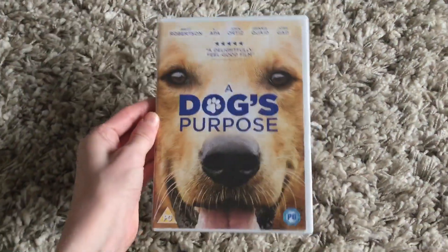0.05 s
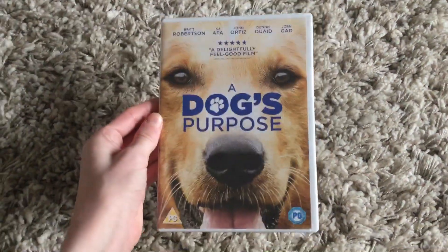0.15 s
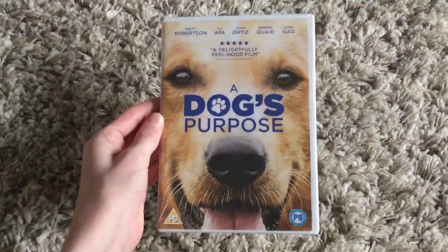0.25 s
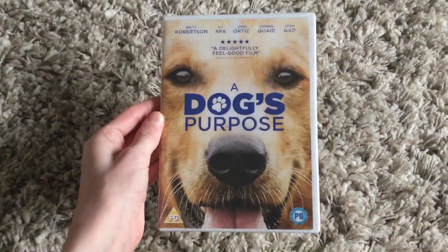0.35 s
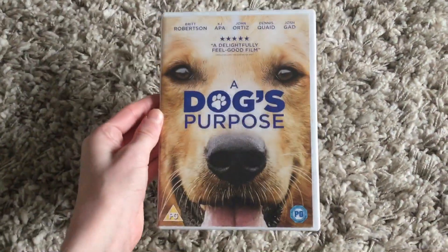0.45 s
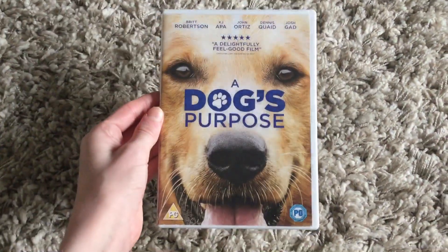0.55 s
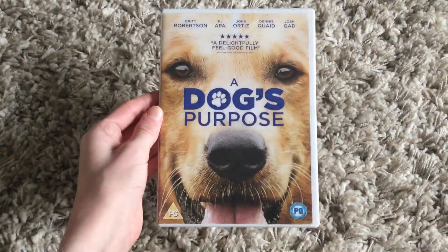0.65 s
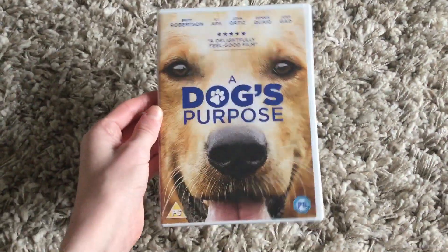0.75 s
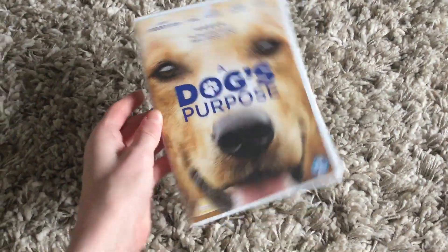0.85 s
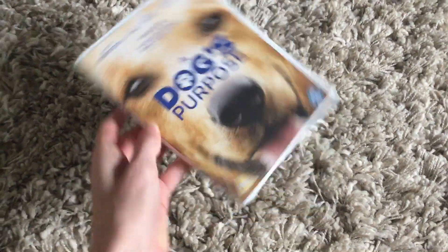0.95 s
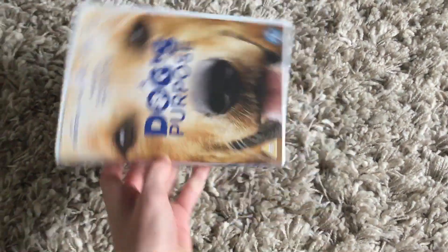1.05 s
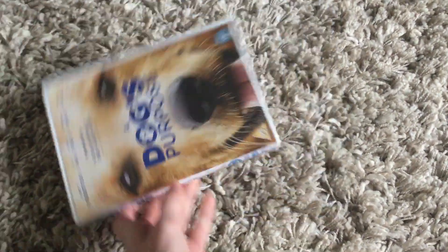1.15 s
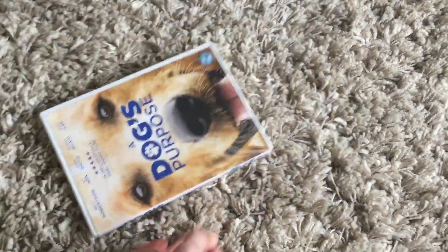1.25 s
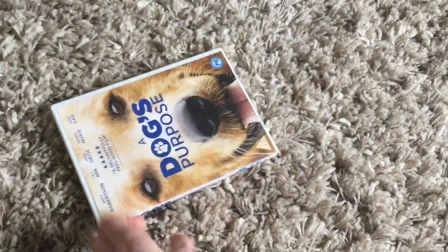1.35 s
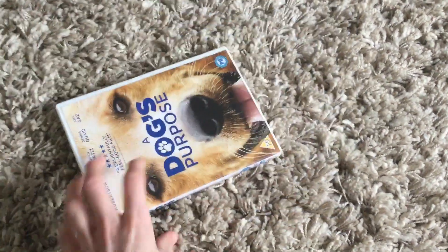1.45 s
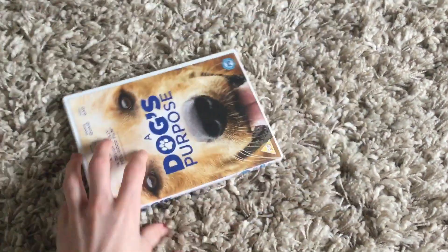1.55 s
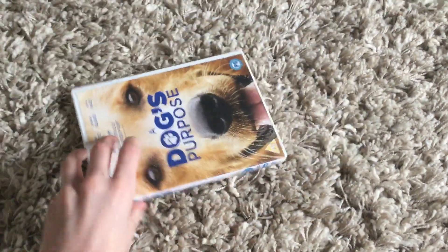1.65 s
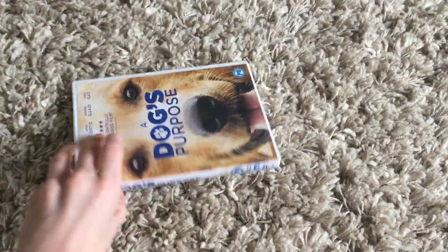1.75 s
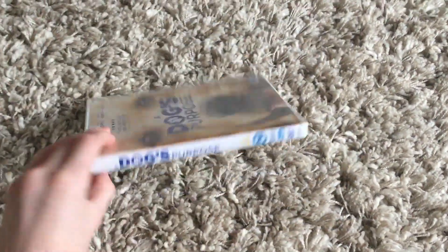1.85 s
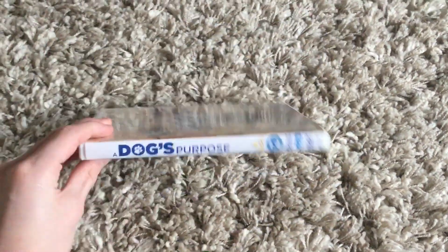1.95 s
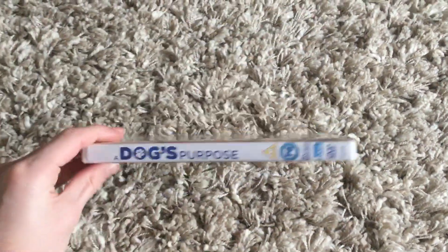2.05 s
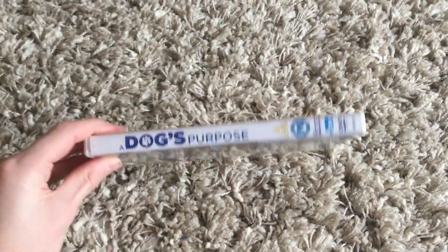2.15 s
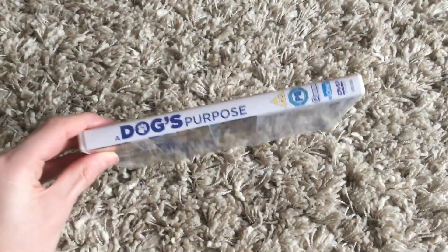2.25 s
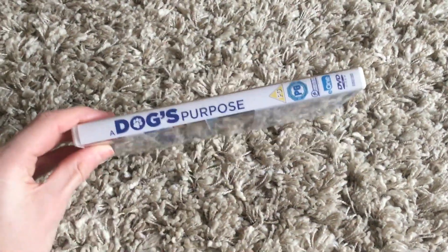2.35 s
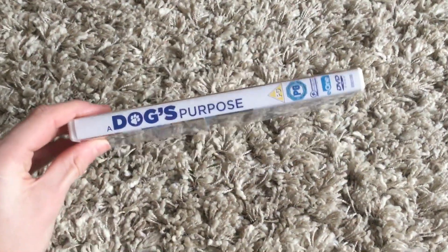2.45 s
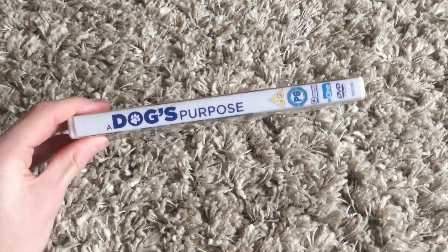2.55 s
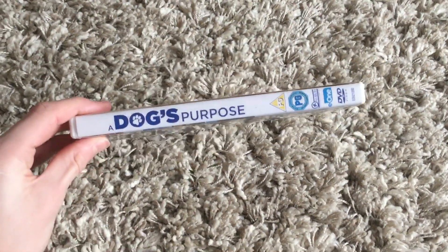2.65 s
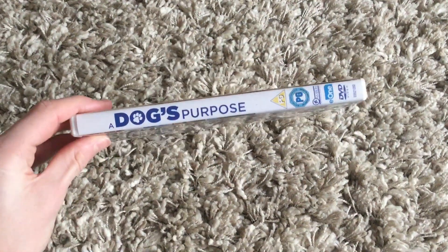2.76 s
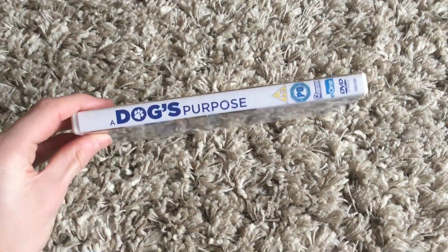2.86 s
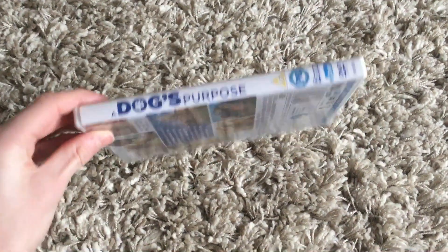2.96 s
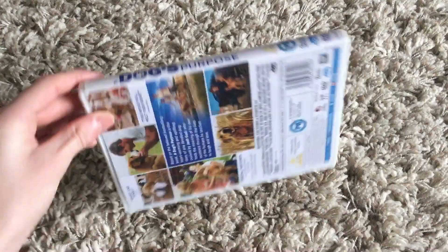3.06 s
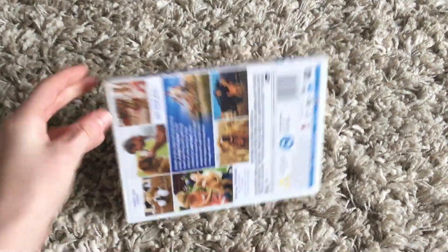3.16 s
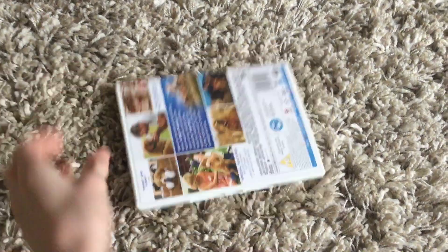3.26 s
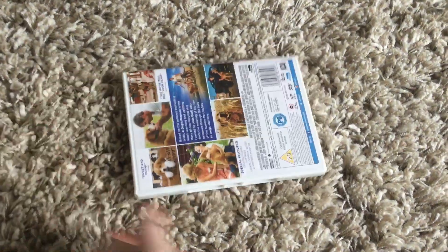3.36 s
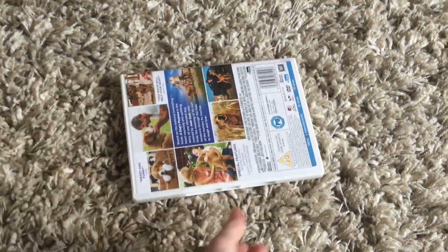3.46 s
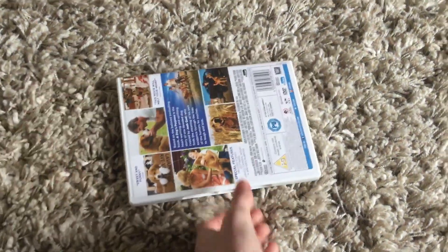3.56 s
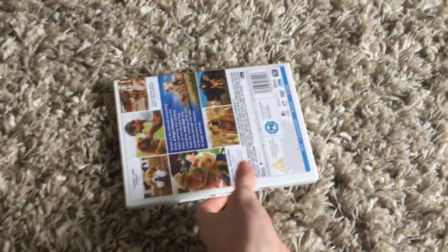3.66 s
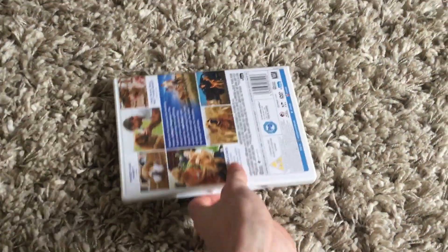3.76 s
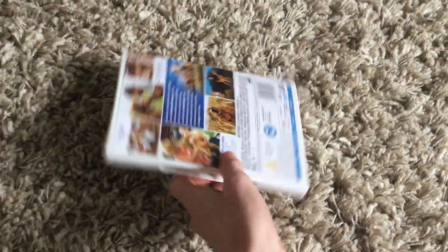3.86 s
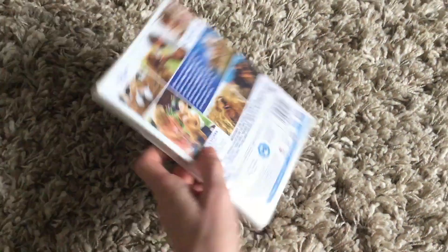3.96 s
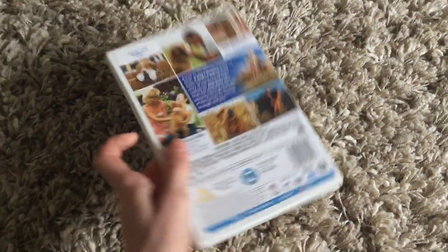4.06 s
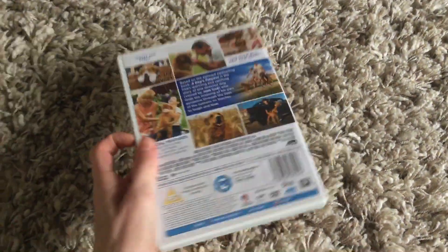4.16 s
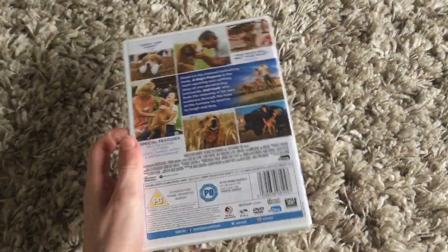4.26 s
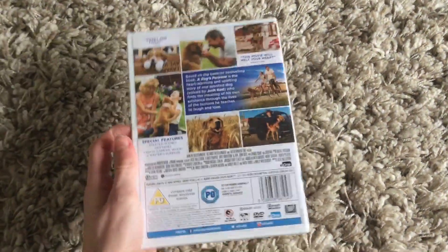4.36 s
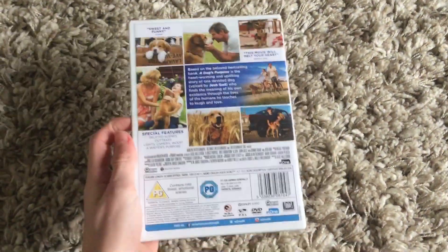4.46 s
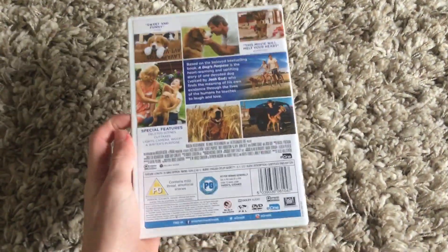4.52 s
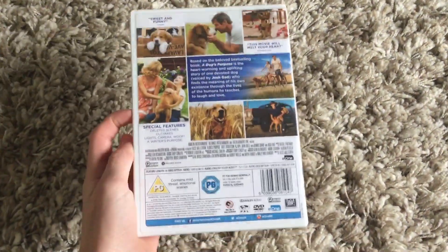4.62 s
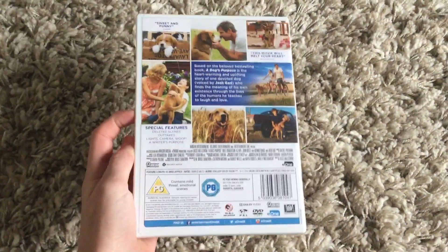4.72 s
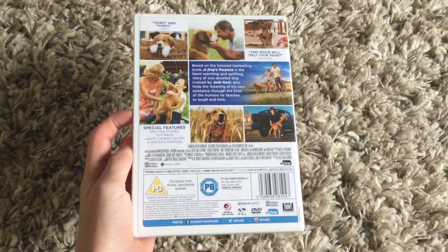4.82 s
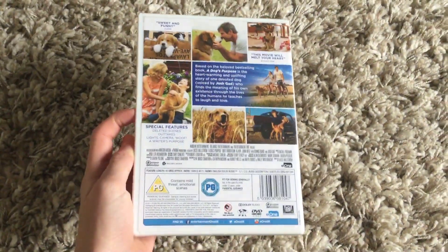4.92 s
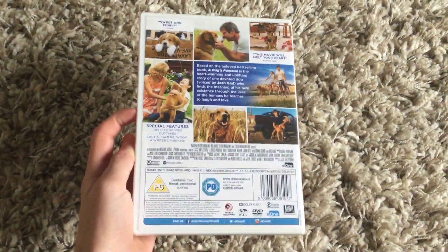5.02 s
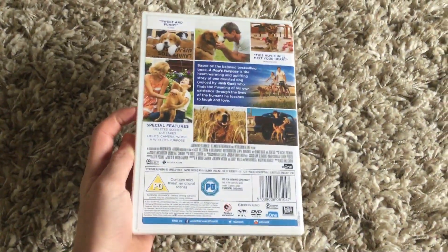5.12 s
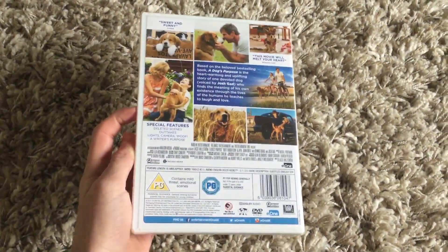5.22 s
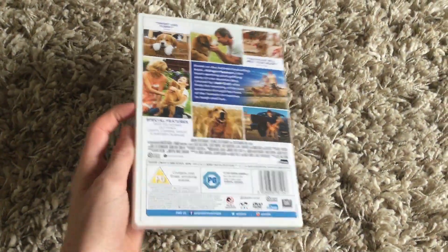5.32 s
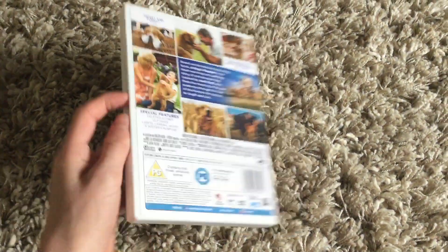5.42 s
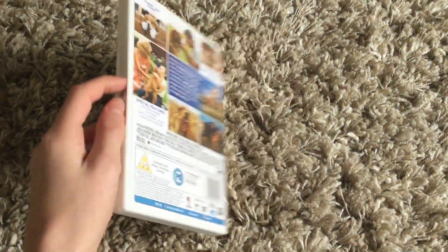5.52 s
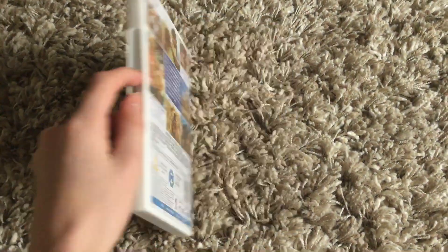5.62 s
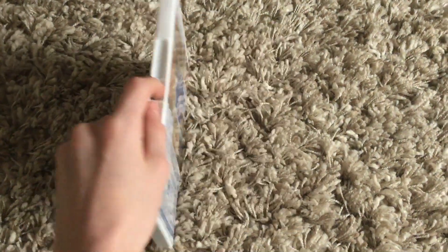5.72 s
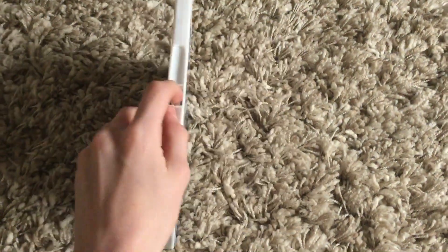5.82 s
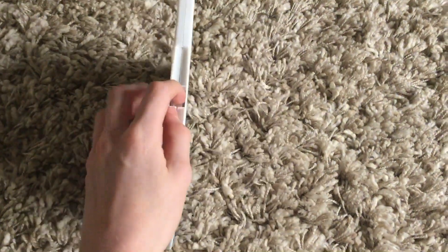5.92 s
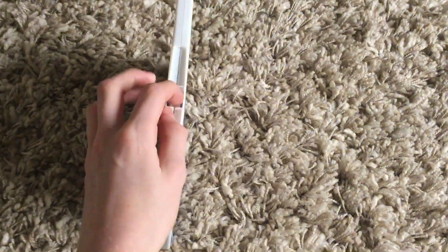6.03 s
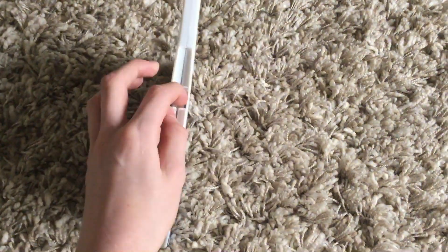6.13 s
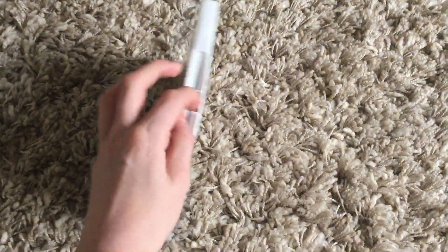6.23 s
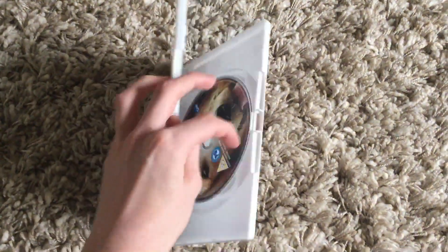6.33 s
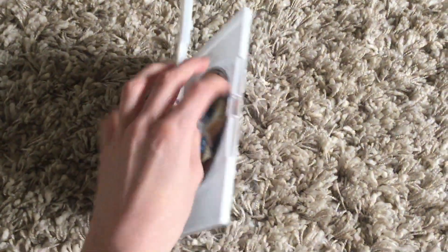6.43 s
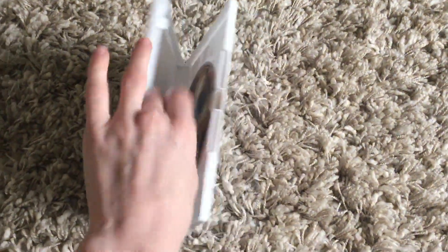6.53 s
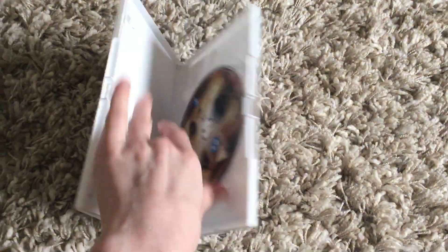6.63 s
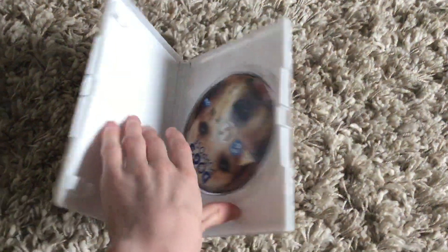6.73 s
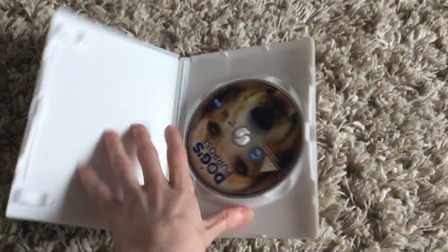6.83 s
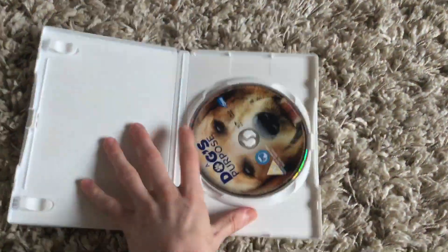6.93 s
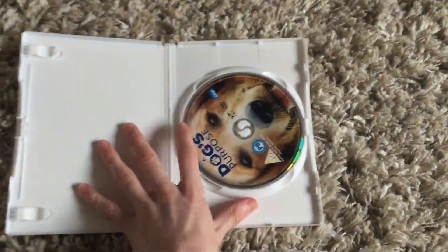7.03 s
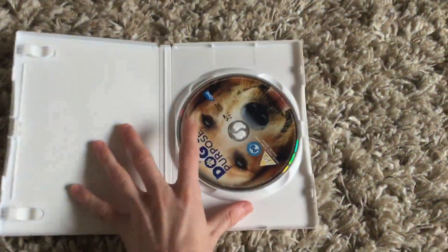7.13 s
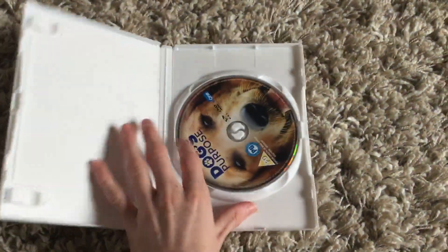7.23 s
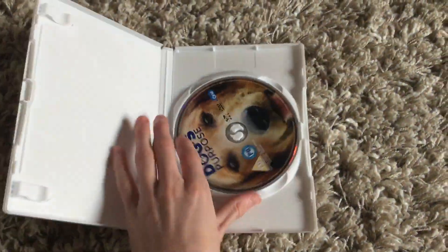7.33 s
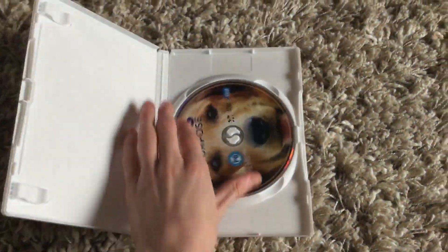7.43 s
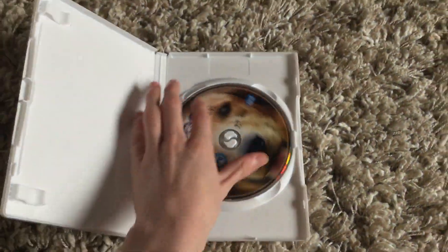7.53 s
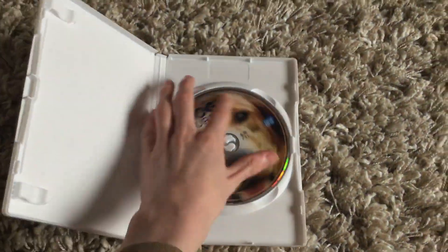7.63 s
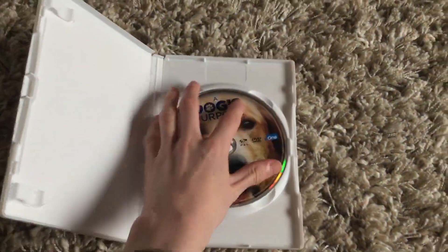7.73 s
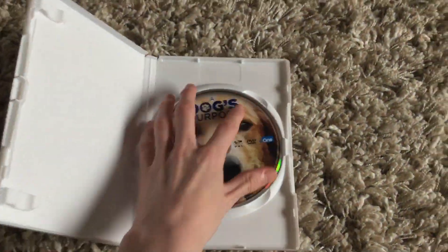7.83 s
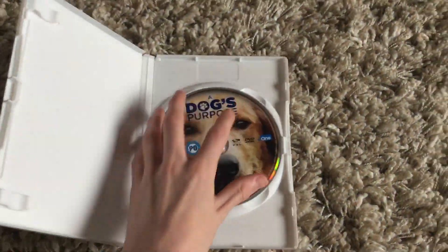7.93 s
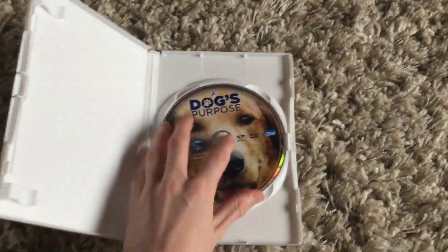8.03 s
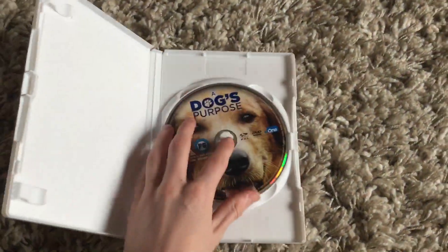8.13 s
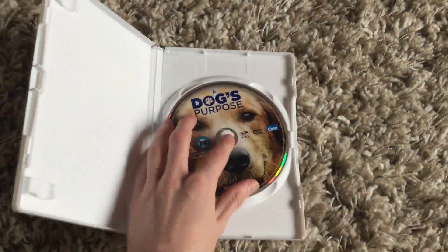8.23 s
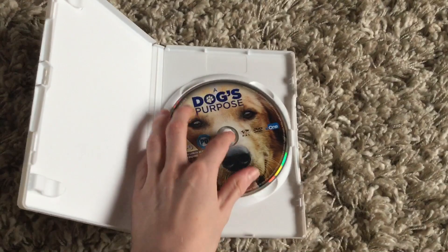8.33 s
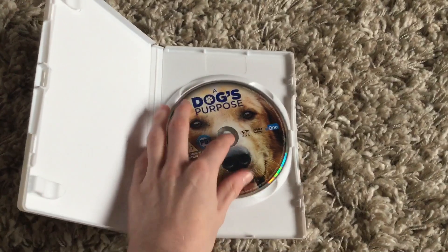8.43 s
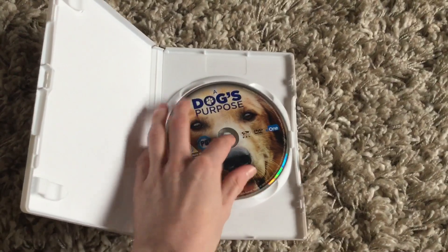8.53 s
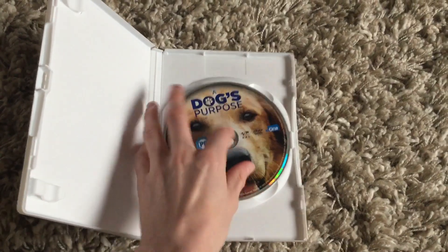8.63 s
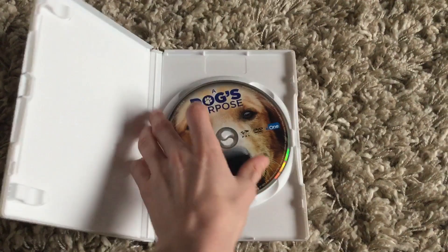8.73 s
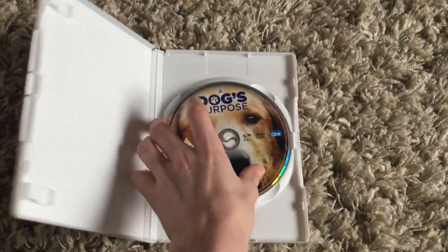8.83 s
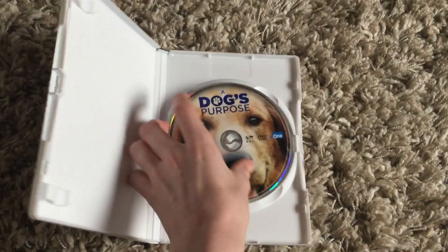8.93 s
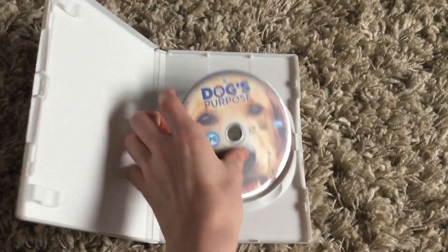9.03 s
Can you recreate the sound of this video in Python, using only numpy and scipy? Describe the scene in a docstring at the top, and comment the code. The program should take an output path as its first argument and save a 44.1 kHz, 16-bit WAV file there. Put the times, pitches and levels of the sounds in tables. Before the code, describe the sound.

A quiet furnished room, faint smooth hiss and low rumble, with a weak unsteady hum coming and going. Close to a phone microphone, a plastic disc case is handled over thick carpet. From 0.75 to 1.9 s there are only very soft taps, creaks and brushing. After a quiet gap, a sharp rattling clatter at 3.2-3.4 s as the case flips and the disc shakes inside, with a soft thump; lighter taps at 3.75 and 3.9-4.2 s, then tiny creaks to 4.8 s. Near quiet until 6.25 s, when the catches snap open loudly with a low thud. The lid scrapes and clicks at 6.5-6.9 s, with small taps after. At 7.3-7.7 s the disc rubs round in a mid-pitched scrape. Faint brushing leads to a very sharp pop at 8.4 s, a click at 8.75 s, and small clicks and a short scrape near 9 s.

```python
"""A faint hiss and low rumble of a quiet room; then taps and creaks of a plastic disc case turned in one hand.
It lies on thick carpet, close under a phone; the loose disc rattles in the shut case.
The catches snap open, the lid scrapes round, fingers spin the disc on its hub and pop it free.
Noise chatters (taps, creaks) and noise grains (rubbing) ring the shell modes; thumps and a hum are sines.
A short noise tail is the room."""
import sys
import numpy as np
from scipy import signal
from scipy.fft import rfft, irfft
from scipy.io import wavfile
from scipy.ndimage import uniform_filter1d

SR = 44100
rng = np.random.default_rng(int(sys.argv[2]) if len(sys.argv) > 2 else 0)


def convert_level_to_amplitude(level_db):
    """Map a level in decibels to its linear amplitude factor."""
    exponent = np.asarray(level_db, float) / 20
    return 10 ** exponent


def unload_audio(sound):
    """Save the sound as a 16-bit wav file, at the path given as the first command line argument."""
    columns = np.transpose(np.atleast_2d(sound))
    # keep every value between -1 and 1, then stretch to whole-number steps
    steps = np.round(np.clip(columns, -1, 1) * 32767)
    wavfile.write(sys.argv[1], SR, steps.astype(np.int16))


N = 400428
OPENS_S, LIES_FLAT_S = 6.2, 6.88
LOW_HZ, HIGH_HZ = 1500, 5000
# low, middle, treble
BANDS_HZ = [(300, LOW_HZ), (LOW_HZ, HIGH_HZ), (HIGH_HZ, 15500)]
EDGE_FILTERS = [signal.butter(2, lo / np.sqrt(2), "high", fs=SR, output="sos") for lo, _ in BANDS_HZ]


def rms(x):
    """Root mean square, kept above zero."""
    return np.sqrt(np.mean(x ** 2)) + 1e-12


def coloured(points, size):
    """Noise of rms 1 with a spectrum of (frequency [Hz], relative level [dB per Hz]) points."""
    hz, db = np.transpose(points)
    f = np.fft.rfftfreq(size, 1 / SR) + 1
    gain = convert_level_to_amplitude(np.interp(np.log(f), np.log(hz), db, -99, -99))
    x = irfft(rfft(rng.standard_normal(size)) * gain, size)
    return x / rms(x)


def walk(rate_hz):
    """Random levels held 1 / rate_hz and slewed; spread a little below 1."""
    k = int(SR / rate_hz)
    held = np.repeat(rng.standard_normal(N // k + 1), k)
    return uniform_filter1d(held, k)[:N]


def add(out, x, s):
    """Mixes x into out from s seconds on."""
    i = int(s * SR)
    out[i:i + len(x)] += x[:len(out) - i]


# hiss spectrum: (frequency [Hz], relative level [dB per Hz])
HISS_COLOUR = [(130, -32), (220, -2), (344, -3.5), (384, -9), (590, -10.5), (1190, -17), (1670, -14),
               (2030, -20.5), (3480, -19.5), (11200, -26.5), (16000, -27)]
# rumble spectrum: (frequency [Hz], relative level [dB per Hz])
RUMBLE_COLOUR = [(12, -67.5), (20, -30.5), (39, -6.5), (91, -3), (182, -5.5), (300, -22.5), (390, -47.5),
                 (660, -120)]
HISS_DB, RUMBLE_DB = -72, -67


def background():
    """Smooth hiss with broad humps and a low rumble: filtered noise, levels wavering slightly."""
    rumble = coloured(RUMBLE_COLOUR, N) * convert_level_to_amplitude(RUMBLE_DB + 0.96 * walk(37))
    hiss = coloured(HISS_COLOUR, N) * convert_level_to_amplitude(HISS_DB + 0.5 * walk(12))
    return rumble + hiss


# modes of the shut shell: (frequency [Hz], relative level [dB], t60 [s])
SHUT_MODES = [(670, 1, 0.026), (970, -2, .045), (1130, 4, 0.018), (1375, 5.5, 0.0068), (1784, -6, 0.024),
              (2154, -5.5, 0.033), (2550, -1, 0.025), (3100, -0.5, 0.011), (3750, -4.5, 0.022),
              (4543, -10, 0.018), (5380, 9.5, 0.014), (6310, 5, 0.0077)]
# modes of the open shell: (frequency [Hz], relative level [dB], t60 [s])
OPEN_MODES = [(660, -4.5, 0.074), (790, 2, 0.046), (1070, 8.5, 0.018), (1430, 11, 0.0087),
              (1630, -12.5, 0.035), (1891, -1, 0.018), (2130, 4, 0.013), (2650, 2, 0.012),
              (3043, -5.5, 0.019), (3750, -6.5, 0.0068), (4515, -2.5, 0.0074), (5200, 1, 0.018),
              (6300, 1.5, 0.033), (8420, -2, 0.032)]


def shell_modes(s):
    """Opening the case changes the set of modes that ring."""
    return SHUT_MODES if s < OPENS_S else OPEN_MODES


# passbands of the clack: (from [Hz], to [Hz])
CLACK_HZ = [(540, 2600), (1800, 3920), (4800, 14800)]
CLACK_FILTERS = [signal.butter(3, band, "band", fs=SR, output="sos") for band in CLACK_HZ]
T = np.arange(2048) / SR


def shell(modes, best_hz, boost_db, scatter_db, detune, clack):
    """Low, middle and treble answers to one contact; modes near best_hz are struck hardest."""
    hz, db, t60_s = np.transpose(modes)[:, :, None]
    level_chance, pitch_chance = rng.standard_normal((2, len(modes), 1))
    nearness = np.exp(-(np.log(hz / best_hz) / 0.18) ** 2)
    db = db + boost_db * nearness + scatter_db * level_chance
    hz_now = hz * (1 + detune * pitch_chance)
    rings = convert_level_to_amplitude(db) * np.sin(2 * np.pi * hz_now * T) * 1000. ** (-T / t60_s)
    # countless weak modes between the strong ones blur into a short clack; the treble ones fizz longer
    click = 1. * (T == 0)
    fizz = rng.standard_normal(len(T)) * np.exp(-T / 0.0013)
    blur = [signal.sosfilt(sos, blow) for sos, blow in zip(CLACK_FILTERS, (click, click, fizz))]
    return [rings[(hz[:, 0] > lo) & (hz[:, 0] <= hi)].sum(axis=0) + share * clap
            for (lo, hi), share, clap in zip(BANDS_HZ, clack, blur)]


# taps, rattles, snaps: (time [s], middle rms over first 10 ms [dB], lows above middle [dB],
# best-rung frequency [Hz], chatter [ms])
TAPS = [(0.7546, -61.5, -10, 3080, 0.37), (1.1857, -57.5, -3, 1870, 6.4), (1.2253, -59.5, 9.5, 725, 3.2),
        (1.234, -53, -0.5, 660, 1.7), (1.4879, -55.5, 2.5, 750, 2.8), (1.4977, -49, -14, 1770, 7.4),
        (1.6193, -57.5, 2.5, 820, 3.5), (1.6372, -65, 10, 605, 26), (1.8321, -60.5, 3.5, 620, 2.2),
        (1.85, -65, -2, 1800, 5), (1.8881, -54, 2.5, 660, 2.9), (3.1494, -53, -22, 3700, 4.9),
        (3.197, -31, -8.5, 3750, 3.9), (3.2301, -44.5, 1, 696, 17), (3.248, -24, -9, 3830, 7.3),
        (3.2629, -30, -1.5, 3130, 11.4), (3.284, -35.5, -12, 3250, 8.2), (3.361, -47, -4, 3200, 17),
        (3.3798, -48, -5, 2600, 9.4), (3.4117, -55, 1, 2520, 13), (3.7326, -53.5, -7, 3740, 3.2),
        (3.75, -47, -5, 3160, 6.6), (3.7693, -56, 2.7, 2520, 6.8), (3.796, -54.5, -5, 3060, 5.9),
        (3.9129, -54.5, 8.5, 720, 14), (3.9226, -42.5, -3, 2550, 2.5), (3.9347, -51, -17, 3260, 1.1),
        (3.9568, -40.5, -6.5, 2650, 3.5), (3.9778, -56, 4, 1030, 3.4), (3.9887, -50.5, -1.5, 3020, 16),
        (4.119, -44.5, 2.5, 1130, 4.4), (4.1455, -50, -33, 3170, 8.8), (4.1569, -48, -21, 3570, 14),
        (4.1821, -53, 8.5, 1060, 1.7), (5.7608, -58, -9, 3880, 9.4), (6.2423, -29, -29, 4620, 2.9),
        (6.2481, -17, -0.5, 1320, 4.7), (6.2531, -35, -4, 4650, 4.4), (6.2619, -22.5, -11, 1420, 10.1),
        (6.278, -29.5, -7, 970, 17), (6.465, -61.5, -8.5, 4510, 7.4), (6.486, -58.5, 10, 1080, 7.2),
        (6.5361, -33.5, -3, 1050, 7.3), (6.6044, -35.5, -20, 4670, 4.5), (6.611, -35.5, 3.5, 1010, 10),
        (6.6272, -36, -10.5, 980, 16), (6.6489, -50.5, 4, 970, 14), (6.8986, -58, 0, 2170, 15),
        (6.9182, -51.5, -3, 2130, 6), (7.0384, -42, -3, 2160, 3.9), (7.2328, -43, 1, 624, 20.4),
        (7.6357, -50.5, -32, 3780, 4.5), (7.6724, -53, -41, 1875, 3.9), (8.006, -42.5, 2.2, 607, 7.4),
        (8.318, -57.5, -17, 4710, 1.6), (8.407, -32.5, -26, 3000, 13), (8.4163, -13, -45, 2740, .06),
        (8.4223, -23.5, -6, 1870, 10), (8.5968, -52.5, 4, 855, 2.8), (8.6387, -63.5, 12.5, 820, 2.9),
        (8.6527, -54.5, -5, 820, 2.8), (8.7567, -27.5, -7.5, 2123, 5.1), (8.8532, -67.5, 17, 652, 4),
        (8.9133, -59.5, 15, 670, 7.1), (8.9359, -48.5, -3, 694, 7.4), (8.9496, -42.5, -3, 2130, 4.8),
        (8.9777, -61, 7, 626, 6.9), (8.9904, -39.5, -4, 1610, 3.7)]
# treble above middle at 4 ms chatter: shut (muffled), lid swinging (bright), lying flat (duller)
TREBLE_DB = (-13.5, -6, -13.5)
SOFT_DB_PER_DOUBLING = -2  # longer chatter is duller


def tap_contacts():
    """Taps as rows (time [s], lows [dB], middle [dB], treble [dB], best-rung [Hz], chatter [ms])."""
    rows = []
    for s, db, low_db, hz, ms in TAPS:
        stage = int(s > OPENS_S) + int(s > LIES_FLAT_S)
        soft_db = SOFT_DB_PER_DOUBLING * np.log2(max(ms, 1) / 4)
        rows.append((s, db + low_db, db, db + TREBLE_DB[stage] + soft_db, hz, ms))
    return rows


# shut shell creaking in the grip: (time [s], lows rms over first 10 ms [dB], chatter [ms])
CREAKS = [(0.77, -69, 43), (0.862, -71, 23), (0.98, -69, 25), (1.11, -71.5, 32), (3.0155, -61, 19),
          (4.0945, -50, 5.4), (4.2078, -60, 5.5), (4.244, -61.5, 8.2), (4.2775, -60, 5.4), (4.3, -63, 13),
          (4.37, -57.5, 11), (4.3977, -58.5, 12), (4.4237, -59, 11), (4.5057, -62, 2.5),
          (4.7413, -51, 10.6), (4.779, -67, 16), (5.309, -65, 4.6), (5.4277, -64.5, 15), (5.6207, -62, 12)]
CREAK_HZ, CREAK_MIDDLE_DB, CREAK_TREBLE_DB = 1034, -5, -30  # middle, treble: above the lows


def creak_contacts():
    """Creaks are contacts weighted to the lows, in the same rows as the taps."""
    return [(s, db, db + CREAK_MIDDLE_DB, db + CREAK_TREBLE_DB, CREAK_HZ, ms) for s, db, ms in CREAKS]


def contacts():
    """All taps and creaks."""
    return tap_contacts() + creak_contacts()


def chatter():
    """Each contact is a quickly swelling chatter of uneven ticks that dies away, ringing the shell."""
    out = np.zeros(N)
    for s, *dbs, best_hz, chatter_ms in contacts():
        ticks = rng.standard_normal(len(T)) * convert_level_to_amplitude(5.2 * rng.standard_normal(len(T)))
        ticks *= np.exp(-(1000 * T / chatter_ms) ** 2)
        ticks *= 1 - np.exp(-T / 0.00023)
        parts = shell(shell_modes(s), best_hz, boost_db=10, scatter_db=3.5, detune=0.014, clack=(12, 20, 6))
        for part, db, edge in zip(parts, dbs, EDGE_FILTERS):
            sound = signal.sosfilt(edge, signal.fftconvolve(ticks, part))
            add(out, convert_level_to_amplitude(db) * sound / rms(sound[:SR // 100]), s)
    return out


RUSTLE_DB, RUSTLE_SWELL_S, RUSTLE_FADE_DB_PER_S = -11, 0.0048, 279  # level: above contact, 8 ms chatter


def rustle(t):
    """After each contact the parts rustle on, fading; longer chatter rustles louder."""
    layers = []
    for s, *dbs, hz, ms in contacts():
        fade_db = RUSTLE_DB - RUSTLE_FADE_DB_PER_S * np.maximum(t - s, 0)
        swell = np.clip((t - s) / RUSTLE_SWELL_S, 0, 1) * np.sqrt(ms / 8)
        layers.append((convert_level_to_amplitude(np.array(dbs)[:, None] + fade_db) * swell, hz))
    return layers


# fingers and carpet brushing the shell: (start [s], length [s], middle level [dB],
# lows above middle [dB], favoured frequency [Hz])
STROKES = [(1.213, 0.027, -65, 7, 1710), (1.504, 0.012, -63, 5.5, 2000), (1.603, 0.29, -75.5, -6, 1970),
           (3.155, 0.11, -59.5, -7, 2530), (3.358, 0.08, -72, 3.5, 2500), (3.678, 0.14, -78.5, 1, 2590),
           (3.868, 0.092, -62.5, -3.7, 2610), (4.015, 0.21, -73, 4, 1060), (4.294, 0.52, -82, 5, 1040),
           (5.727, 0.042, -74, -9.5, 2660), (6.907, 0.42, -68.5, -3, 2090), (7.751, 0.91, -79, -3.4, 2400),
           (8.3, 0.12, -76, -13, 2612), (8.471, 0.043, -60, -8.5, 2600), (8.597, 0.073, -63, 8.5, 790),
           (8.892, 0.076, -64, 1, 1010), (9.024, .02, -42.5, -4.5, 1230), (9.038, .05, -42.5, -11, 2690)]
STROKE_RISE_DB_PER_S, STROKE_FALL_DB_PER_S, STROKE_TREBLE_DB = 498.5, 296, -7  # treble: above middle


def strokes(t):
    """Each brush holds a level between a steep rise and fall."""
    layers = []
    for s, length_s, db, low_db, hz in STROKES:
        rise_db = STROKE_RISE_DB_PER_S * np.maximum(s - t, 0)
        fall_db = STROKE_FALL_DB_PER_S * np.maximum(t - s - length_s, 0)
        tilt_db = np.array([[low_db], [0], [STROKE_TREBLE_DB]])
        layers.append((convert_level_to_amplitude(db - rise_db - fall_db + tilt_db), hz))
    return layers


# whole case on carpet or palm: (time [s], level before swell and decay [dB], frequency [Hz], t60 [s])
THUMPS = [(1.234, -43.5, 79.5, 0.23), (3.246, -36, 199, 0.1), (3.915, -32.5, 194, 0.067),
          (6.242, -27, 90.7, 0.1), (6.251, -32, 176.4, 0.13), (6.609, -40.5, 338, 0.16),
          (8.417, -36, 223, 0.07)]


def thumps():
    """A soft landing: one damped low swing of the flat case."""
    out, t = np.zeros(N), np.arange(SR // 4) / SR
    for s, db, hz, t60_s in THUMPS:
        swing = np.sin(2 * np.pi * hz * t) * (1 - np.exp(-t / 0.002)) * 1000. ** (-t / t60_s)
        add(out, convert_level_to_amplitude(db) * swing, s)
    return out


# low hum: (time [s], frequency before waver [Hz], level before waver [dB])
HUM = [(1.948, 79, -82.5), (2.25, 96, -53), (2.35, 94.2, -122), (2.999, 66, -68), (3.148, 73.3, -56),
       (3.299, 92.6, -59), (3.849, 95, -55), (3.95, 93.4, -84), (5.601, 67.96, -76), (5.951, 77.4, -55.5),
       (6.2, 88, -63), (6.3, 90.6, -84), (7.001, 66.4, -78), (7.18, 76.4, -54.5), (7.449, 98, -67),
       (7.55, 95, -71)]


def hum():
    """An unsteady low sine that comes and goes, mostly gliding up."""
    s, hz, db = np.transpose(HUM)
    t = np.arange(N) / SR
    hz_now = np.interp(t, s, hz) * (1 + 0.013 * walk(7.1))
    level_db = np.interp(t, s, db) + 4 * walk(6.6)
    return convert_level_to_amplitude(level_db) * np.sin(2 * np.pi * np.cumsum(hz_now) / SR)


# lid swinging open: (time [s], middle level [dB], lows above middle [dB], favoured frequency [Hz])
LID = [(6.4, -80, 7, 1400), (6.45, -73, 3, 1300), (6.5, -67.5, 13.5, 1340), (6.56, -55, -1, 1360),
       (6.64, -46.5, -1.5, 1400), (6.72, -59.5, 1.5, 1240), (6.77, -64, 1, 900), (6.83, -60, 3, 696),
       (6.882, -74, 5, 700)]
LID_TREBLE_DB = 0.5  # above middle


def lid(t):
    """Hinge and sleeve scrape as the lid swings; level and pitch follow the table."""
    s, db, low_db, hz = np.transpose(LID)
    lid_db = np.interp(t, s, db, -120, -120)
    gain = convert_level_to_amplitude([lid_db + np.interp(t, s, low_db), lid_db, lid_db + LID_TREBLE_DB])
    return gain, np.interp(t, s, hz)


# disc spun on its hub: (time [s], middle level [dB], lows above middle [dB])
SPIN = [(7.27, -77, -4), (7.34, -53, -5), (7.391, -49, -30), (7.46, -48, -26), (7.5, -49.5, -14),
        (7.524, -56.5, -19), (7.55, -47, -17), (7.61, -51.5, -35), (7.661, -59, -31), (7.69, -62.5, -21.5),
        (7.71, -81, -10)]
SPIN_HZ, SPIN_TREBLE_DB = 2200, -21.5  # treble: above middle


def spin(t):
    """The disc rubs its hub, mostly in the middle band."""
    s, db, low_db = np.transpose(SPIN)
    spin_db = np.interp(t, s, db, -120, -120)
    gain = convert_level_to_amplitude([spin_db + np.interp(t, s, low_db), spin_db, spin_db + SPIN_TREBLE_DB])
    return gain, SPIN_HZ


def friction(t):
    """Strength of all rubbing in the three bands, and the power-weighted pitch it favours."""
    layers = rustle(t) + strokes(t) + [lid(t), spin(t)]
    power = sum(gain ** 2 for gain, _ in layers)
    pitch = sum(np.sum(gain ** 2, axis=0) * np.log(hz) for gain, hz in layers)
    return np.sqrt(power), np.exp(pitch / np.sum(power, axis=0))


HINGE_DB, HINGE_T60_S = -2, 0.029  # extra mode: the bending hinge


def rubs():
    """Uneven stick-slip grains feed the modes; the contact point wanders every few hundredths of a second."""
    out, t = np.zeros(N), np.arange(N) / SR
    grain_db = 6 * rng.standard_normal(N) + 1.3 * walk(60) + 3.5 * walk(220)
    grains = rng.standard_normal(N) * convert_level_to_amplitude(grain_db)
    grains /= rms(grains)
    coarse = t[::64]
    gains, focus = friction(coarse)
    pushes = [grains * np.interp(t, coarse, gain) for gain in gains]
    hop = 1536
    for i in range(int(TAPS[0][0] * SR), N + hop, hop):
        modes = shell_modes(i / SR)
        focus_hz = np.interp(i / SR, coarse, focus)
        if LID[0][0] < i / SR < LID[-1][0]:
            modes = modes + [(focus_hz, HINGE_DB, HINGE_T60_S)]
        # a creak singles out one low mode; a scrape spreads over the crowded middle ones
        boost_db = 13 if focus_hz < LOW_HZ else 4
        parts = shell(modes, focus_hz, boost_db, scatter_db=6, detune=0.025, clack=(8, 19, 14))
        for part, push in zip(parts, pushes):
            slip = push[i - hop:i + hop]
            slip = slip * np.sin(np.pi * np.arange(len(slip)) / (2 * hop))
            rung = signal.fftconvolve(slip, part) / np.sqrt(np.sum(part ** 2))
            add(out, rung, (i - hop + 0.5) / SR)
    return out


# room tail bands: (centre [Hz], relative level [dB], t60 [s])
ROOM = [(296, 0, 0.12), (1204, 1, .3), (3433, 6, 0.18), (9660, 21, 0.09)]
ROOM_DB = -19


def room(x):
    """A furnished room: a noise tail, each band dying at its own rate, the top one fastest."""
    t = np.arange(SR // 2) / SR
    tail = np.zeros(len(t))
    for hz, db, t60_s in ROOM:
        band = coloured([(hz / 3, -20), (hz, 0), (hz * 3, -20)], len(t))
        tail += convert_level_to_amplitude(db) * band * 1000. ** (-t / t60_s)
    tail *= np.clip((t - 0.004) / 0.0027, 0, 1)
    return convert_level_to_amplitude(ROOM_DB) * signal.fftconvolve(x, tail / np.sqrt(np.sum(tail ** 2)))[:N]


def scene():
    """The case with its room tail, over the background; so small a shell radiates little bass."""
    small_shell = signal.butter(1, 320, "high", fs=SR, output="sos")
    case = signal.sosfilt(small_shell, chatter() + rubs()) + thumps()
    return (case + room(case) + background() + hum())[None]


def band_limit(x):
    """A steep low-pass at the top of the band."""
    return signal.sosfilt(signal.butter(12, 16380, fs=SR, output="sos"), x)


def record(dry):
    """The phone rolls off the deep bass and clips at full scale."""
    bass_cut = signal.butter(2, 45, "high", fs=SR, output="sos")
    mix = np.clip(signal.sosfilt(bass_cut, dry), -1, 1)
    return band_limit(mix)


dry = scene()
out = record(dry)
unload_audio(out)
```